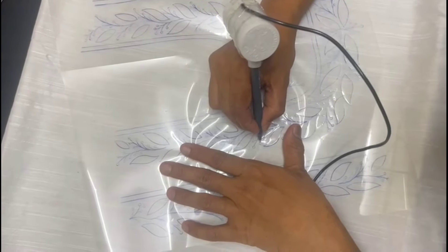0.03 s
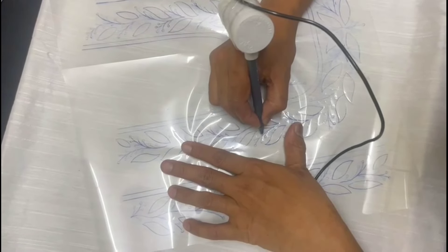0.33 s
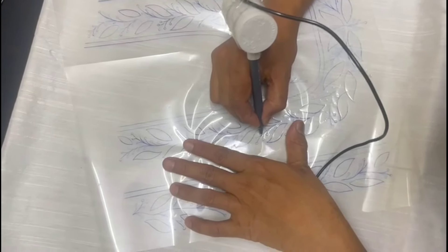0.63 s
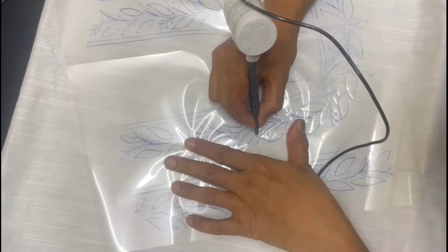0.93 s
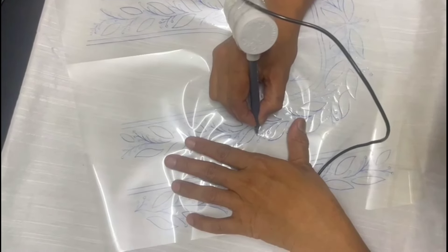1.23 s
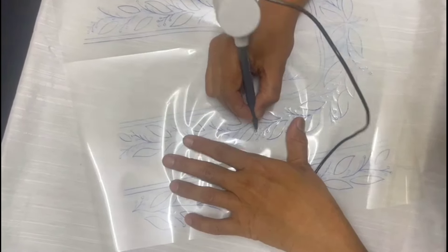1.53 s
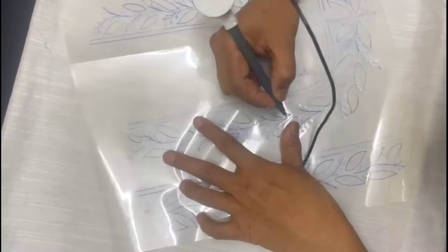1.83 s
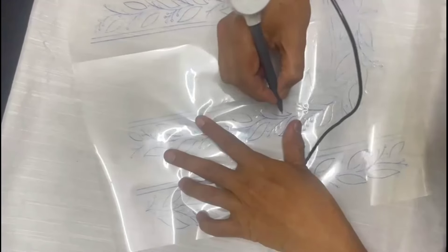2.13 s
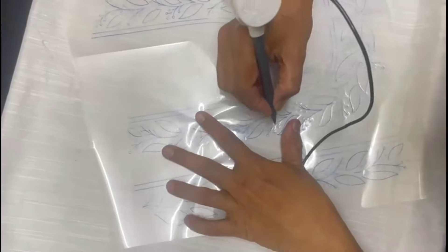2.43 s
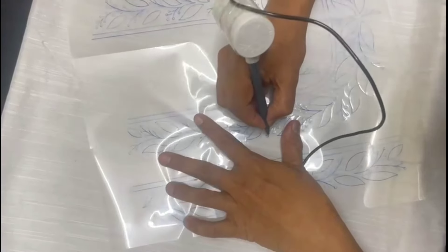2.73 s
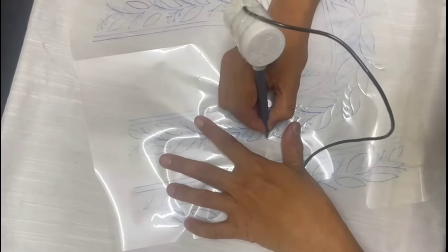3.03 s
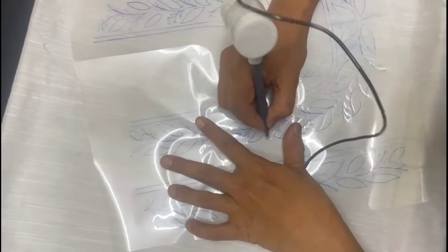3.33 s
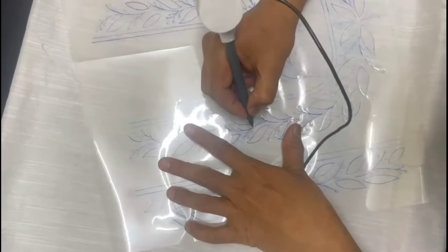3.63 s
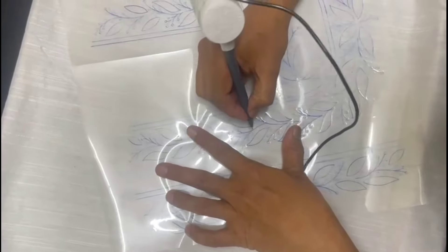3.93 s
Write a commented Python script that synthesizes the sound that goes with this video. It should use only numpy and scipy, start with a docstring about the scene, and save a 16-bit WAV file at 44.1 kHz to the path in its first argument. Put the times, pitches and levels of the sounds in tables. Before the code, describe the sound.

A small motorised pen buzzes close up throughout, with a thin metallic rattle. Its needle taps rapidly through a plastic sheet onto the table from 0.1 to 0.4 seconds, 0.8 to 1.0 and around 1.3, the motor slowing slightly each time. It then runs more freely until sparser taps from 3.0 to 3.4. Hands thud softly on the table near the start, at 2 and at 3 seconds.

```python
"""Rapid needle taps over a rattling whirr: a small motorised pen pricks a glossy sheet on a table, close up.
The motor turns about 40 times a second and sags under load; its linkage rattles at fixed points of a turn.
In four strokes the needle hits the sheet once a turn; it also chatters and slides in its guide.
The hands shift and bump on the table."""
import sys
import numpy as np
from scipy import signal
from scipy.fft import rfft, irfft
from scipy.io import wavfile
from scipy.ndimage import uniform_filter1d

SR = 44100
rng = np.random.default_rng(int(sys.argv[2]) if len(sys.argv) > 2 else 0)


def dump_mix(stems):
    """Bounce the given channels to the path in sys.argv[1] as a 16-bit WAV at rate SR."""
    frames = np.atleast_2d(stems).T  # one column per channel
    limited = np.clip(frames, -1, 1)  # hard clip at full scale
    pcm = np.round(limited * 32767).astype(np.int16)
    wavfile.write(sys.argv[1], SR, pcm)


N = 176400
T = np.arange(N) / SR
HZ = np.fft.rfftfreq(N, 1 / SR)


def needle_taps(turns, load):
    """Blows through the sheet onto the table, each with a crunch; under load, also a rasp once a turn."""
    # start_s, level_db
    hits = [(.0714, 0), (.0973, 0), (.1224, -1.5), (.1484, -1.5), (.174, -5), (.2, -3.5), (.2266, -5),
            (.253, -6), (.28, -5), (.3076, -2), (.3344, -3.5), (.362, -.5), (.7827, -3.5), (.807, -2.5),
            (.8313, -1), (.855, -5), (.8805, -3.5), (.907, -7), (.9324, -6), (.9585, -6), (1.011, -4),
            (1.0387, -.5), (1.265, -2.5), (1.2905, -4.5), (1.317, -6), (1.34, -3), (1.366, -5),
            (1.3915, -4), (1.4174, -7), (3.036, -2), (3.084, -1.5), (3.16, -5.5), (3.186, -4), (3.3175, -7),
            (3.372, -.5)]
    # freq_hz, gain_db
    tap_spectrum = [(150, -12), (600, 2), (1650, 2.5), (2100, -9), (3400, -9.5), (4600, -17), (5300, -8),
                    (6800, -25)]
    tap_gain_db, crunch_gain_db, rasp_gain_db = 3.2, -23, 1
    blows = np.zeros(N)
    for start_s, level_db in hits:
        blows[round(start_s * SR)] = amp(level_db)
    turn_pulses = np.diff(np.floor(turns), prepend=0)
    rasps = amp(rasp_gain_db) * turn_pulses * load ** 2
    crunch = signal.fftconvolve(blows + rasps, swell(T, peak_s=.002))[:N] * port_noise()
    return amp(tap_gain_db) * colour(amp(crunch_gain_db) * crunch - blows, tap_spectrum)


def motor_whirr(turns, load):
    """Bearing roughness, partly the same on every turn, shakes the housing."""
    # freq_hz, gain_db
    housing_spectrum = [(130, -18.5), (230, -0.5), (320, 1), (400, -5), (480, -2.5), (640, -10.5),
                        (1150, -8.5), (1600, -16), (2050, -20), (2550, -14.5), (3300, -23.5), (4500, -44)]
    free_db, load_gain_db, repeat_share = -36, 2.5, .19
    bearing = rng.standard_normal(1024)
    repeating = unit(bearing[(turns % 1 * len(bearing)).astype(int)])
    roughness = np.sqrt(repeat_share) * repeating + np.sqrt(1 - repeat_share) * port_noise()
    return amp(free_db + load_gain_db * load) * unit(colour(roughness, housing_spectrum))


def needle_slide(load):
    """Grainy dry friction of the needle in its guide, louder under load."""
    # freq_hz, gain_db
    friction_spectrum = [(1800, -13.5), (3400, 6), (4550, 1.5), (5300, 10), (5950, -0.5), (7000, 6.5),
                         (9000, 6), (11000, -1), (12000, -14)]
    free_db, load_gain_db, grain_db = -50, 17, 2.5
    grain = amp(grain_db * unit(uniform_filter1d(rng.standard_normal(N), size=60)))
    return amp(free_db + load_gain_db * load) * unit(colour(port_noise() * grain, friction_spectrum))


def linkage_rattles(turns, load):
    """Each loose joint buzzes briefly in its own resonance, once a turn."""
    # place_turns, sigma_turns, pitch_hz, width_hz, level_db, load_gain_db
    joints = [(.87, .07, 8000, 220, -44, -4), (.71, .045, 9100, 600, -52.5, 1.5),
              (.72, .045, 7400, 700, -53, 2), (.71, .05, 10800, 900, -52.5, -2),
              (.22, .06, 10500, 700, -54, -4), (.4, .1, 2520, 300, -55, 2)]
    spread_db, jitter_turns = 2.1, .018
    out = np.zeros(N)
    for place_turns, sigma_turns, pitch_hz, width_hz, level_db, load_gain_db in joints:
        cycle = turns - place_turns + 1.5  # buzz falls mid-cycle
        strength, shift = rng.standard_normal((int(turns[-1]) + 10, 2))[cycle.astype(int)].T
        offset_turns = cycle % 1 - .5 - jitter_turns * shift
        gate = np.exp(-.5 * (offset_turns / sigma_turns) ** 2) * amp(spread_db * strength)
        out += amp(level_db + load_gain_db * load) * unit(ring(pitch_hz, width_hz) * gate)
    return out


def needle_chatter(turns, load):
    """The needle rings in its guide, throbbing with the motor; the pitch drifts as the grip shifts."""
    # time_s, level_db
    levels = [(0, -48.5), (.35, -46.5), (.47, -51.5), (.66, -47.5), (.8, -42), (1.13, -49), (1.46, -46),
              (1.65, -55.5), (2.02, -53), (2.33, -43.5), (2.59, -48), (2.66, -43.5), (2.8, -45.5),
              (3.27, -44.5), (3.55, -53), (3.9, -47)]
    # time_s, pitch_hz
    pitches = [(1.5, 5200), (2.3, 5310), (2.6, 5270), (2.66, 5070), (2.85, 5210)]
    free_place_turns, loaded_place_turns, throb_scale_db = .23, .007, 5.5
    four_per_turn = np.cos(2 * np.pi * 4 * (turns - free_place_turns))
    three_per_turn = np.cos(2 * np.pi * 3 * (turns - loaded_place_turns))
    throb = amp(throb_scale_db * ((1.5 - load) * four_per_turn + load * three_per_turn))
    return amp(curve(levels)) * unit(throb * ring(curve(pitches), width_hz=330))


def hands_on_table(load):
    """Scrapes and soft thuds, each thud trailed by a scuff, over a rumble that grows as the hand presses."""
    # start_s, level_db, pitch_hz
    bumps = [(0.116, -18, 105), (.185, -18.5, 116), (0.213, -28, 98), (0.336, -22.5, 105),
             (1.24, -25.5, 112), (2.007, -17.5, 100), (2.017, -17.5, 180), (2.038, -21, 174.5),
             (2.264, -28, 107), (2.691, -26.5, 95), (2.967, -17.5, 102.6), (2.989, -20, 95),
             (3.003, -15.5, 128), (3.039, -20.5, 132), (3.64, -24, 141), (3.891, -23, 102)]
    # start_s, level_db
    scrapes = [(.72, -32), (1.2, -31.5), (3.83, -31)]
    # freq_hz, gain_db
    scuff_spectrum = [(35, -20), (75, 1), (220, -2), (560, -25), (2000, -70)]
    # freq_hz, gain_db
    rumble_spectrum = [(33, -30), (55, 2), (85, 2.5), (190, -2.5), (300, -18), (700, -50)]
    rumble_db, load_gain_db, scuff_gain_db = -44.5, 4.5, -8.5
    out = amp(rumble_db + load_gain_db * load) * unit(colour(rng.standard_normal(N), rumble_spectrum))
    scuff_power = np.zeros(N)
    for start_s, level_db in scrapes:
        age_s = np.maximum(T - start_s, 0)
        scuff_power += (amp(level_db) * swell(age_s, peak_s=.075)) ** 2
    for start_s, level_db, pitch_hz in bumps:
        age_s = np.maximum(T - start_s, 0)
        out += amp(level_db) * swell(age_s, peak_s=.0075) * np.sin(2 * np.pi * pitch_hz * age_s)
        scuff_power += (amp(level_db + scuff_gain_db) * swell(age_s, peak_s=.02)) ** 2
    return out + np.sqrt(scuff_power) * unit(colour(rng.standard_normal(N), scuff_spectrum))


def room(x, gain_db=-9, t60_s=.017):
    """Short reflections of a small room."""
    tail = port_noise()[:, :SR // 2] * amp(-60 * T[:SR // 2] / t60_s)
    return amp(gain_db) * signal.fftconvolve(x, tail / np.linalg.norm(tail[0]), axes=1)[:, :N]


def ring(pitch_hz, width_hz):
    """A resonance kept rattling: a wavering tone of nearly even strength."""
    band = np.exp(-(np.fft.fftfreq(N, 1 / SR) / width_hz) ** 2)
    waver = np.fft.ifft(np.fft.fft(rng.standard_normal(N)) * band)
    tone = waver / waver.std() * np.exp(2j * np.pi * np.cumsum(pitch_hz * np.ones(N)) / SR)
    return unit(tone.real / np.sqrt(abs(tone) ** 2 + .5))


def port_noise():
    """Noise at the two microphone ports, partly alike."""
    # freq_hz, correlation
    likeness = [(350, 1), (700, .88), (1800, .95), (2800, .8), (4400, .65), (6900, 1)]
    correlation = read(likeness)
    mid, side = rfft(rng.standard_normal((2, N)))
    mid *= np.sqrt((1 + correlation) / 2)
    side *= np.sqrt((1 - correlation) / 2)
    return irfft(np.array([mid + side, mid - side]), N)


def colour(x, spectrum):
    """Minimum-phase filter."""
    log_gain = np.log(amp(read(spectrum, abs(np.fft.fftfreq(N, 1 / SR)))))
    response = np.exp(signal.hilbert(log_gain).conj())[:len(HZ)]
    return irfft(rfft(x) * response, N)


def swell(age_s, peak_s):
    """Rises to 1 at peak_s, then dies away."""
    return (age_s / peak_s * np.exp(1 - age_s / peak_s)) ** 2


def read(points, at_hz=HZ):
    """Interpolate over log frequency."""
    freq_hz, value = np.transpose(points)
    return np.interp(np.log(at_hz + 1), np.log(freq_hz), value)


def curve(points):
    return np.interp(T, *np.transpose(points))


def amp(db):
    return 10 ** (np.asarray(db) / 20)


def unit(x):
    return x / np.sqrt(np.mean(x ** 2) + 1e-20)


def scene():
    """Pen and hands, driven by motor speed and load; only the taps feed the room."""
    # time_s, turns_per_s
    speeds = [(0.0, 40.13), (0.15, 38.82), (0.34, 36.25), (0.5, 40.77), (0.72, 41.63), (0.85, 40.51),
              (1.02, 36.55), (1.17, 41.03), (1.32, 39.75), (1.48, 37.48), (1.75, 42.16), (2.05, 42.06),
              (2.3, 41.77), (2.92, 42.02), (3.1, 40.09), (3.33, 36.95), (3.58, 41.7), (4.0, 41.99)]
    # time_s, load (0 running free, 1 pressed down)
    loads = [(.3, .55), (.38, 0.66), (.45, 0.16), (.68, 0.46), (.78, 0.64), (1.04, 0.63), (1.14, 0.38),
             (1.26, 0.51), (1.5, 0.71), (1.62, 0.44), (2.93, 0.31), (3.02, 0.68), (3.36, 0.64), (3.44, 0.4)]
    turns = .14 + np.cumsum(curve(speeds)) / SR
    load = curve(loads)
    taps = needle_taps(turns, load)
    return (taps + room(taps) + linkage_rattles(turns, load) + needle_chatter(turns, load)
            + motor_whirr(turns, load) + needle_slide(load) + hands_on_table(load))


def record(dry):
    """The two microphone ports differ in treble phase and level; a low-pass follows."""
    # freq_hz, left_lead_rad
    port_phase = [(3700, 0), (4500, -1.8), (5000, -.9), (5850, .1), (6400, 2.5), (7000, 3.13), (8300, 3.16),
                  (9000, 3.9), (10100, 6.283)]
    # freq_hz, left_minus_right_db
    port_balance = [(3000, 0), (4700, -3.5), (5500, 0)]
    cutoff_hz = 11800
    left_gain = np.exp(.5j * read(port_phase)) * amp(read(port_balance) / 2)
    ported = irfft(rfft(dry) * np.array([left_gain, 1 / left_gain]), N)
    lowpass = signal.firwin(401, cutoff_hz, window=("kaiser", 9), fs=SR)
    return signal.oaconvolve(ported, lowpass[None], "same")


dry = scene()
out = record(dry)
dump_mix(out)
```